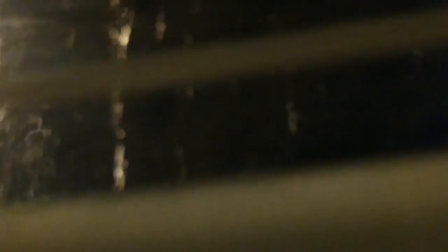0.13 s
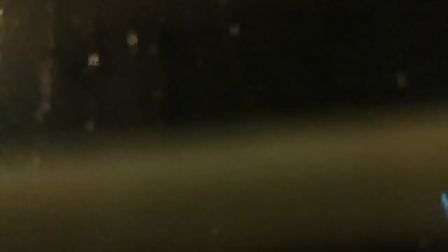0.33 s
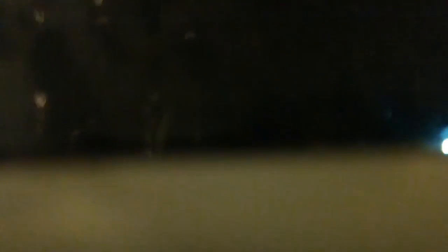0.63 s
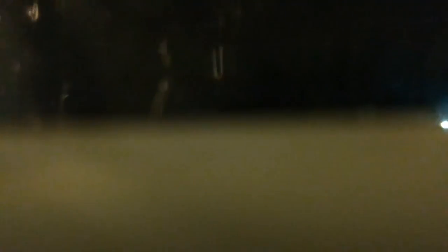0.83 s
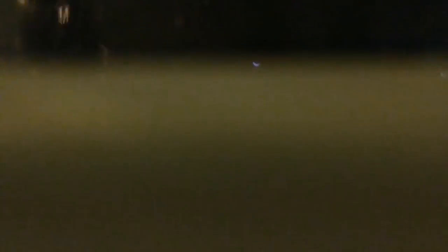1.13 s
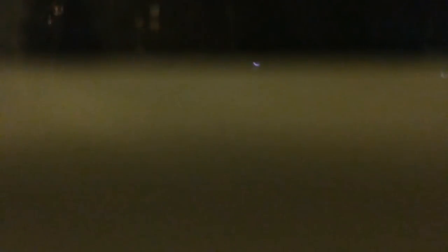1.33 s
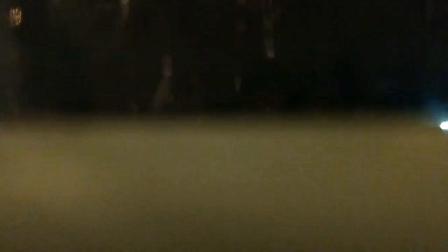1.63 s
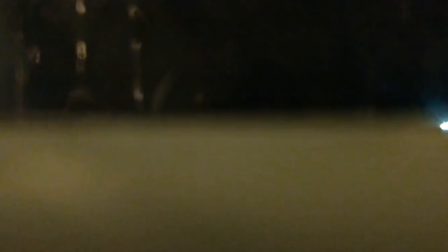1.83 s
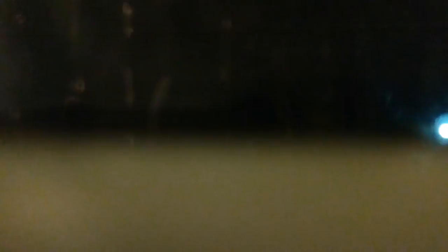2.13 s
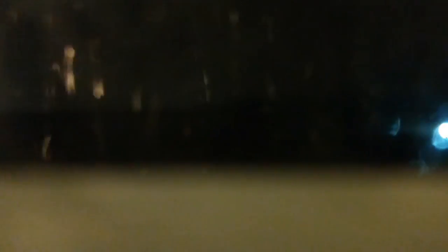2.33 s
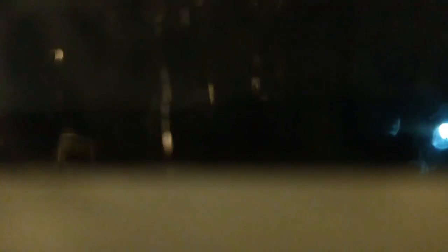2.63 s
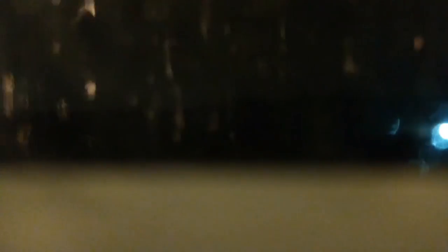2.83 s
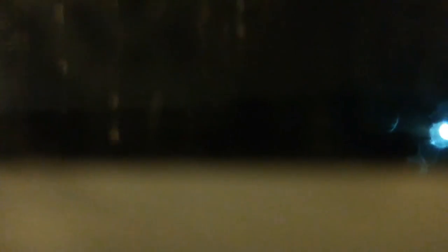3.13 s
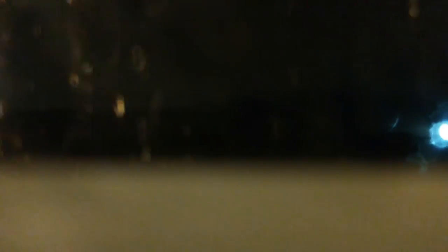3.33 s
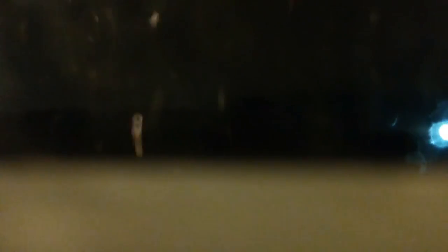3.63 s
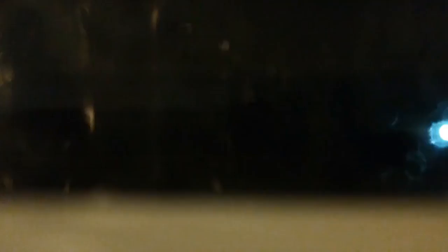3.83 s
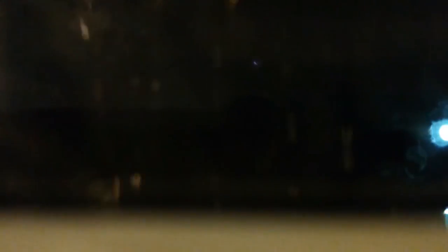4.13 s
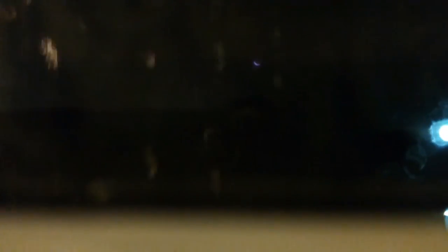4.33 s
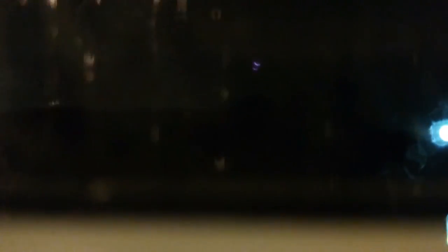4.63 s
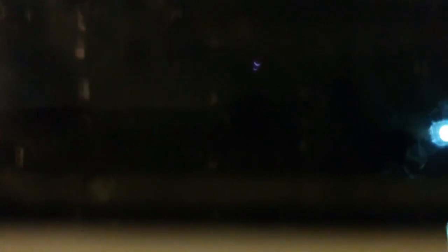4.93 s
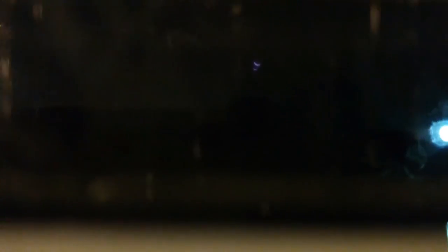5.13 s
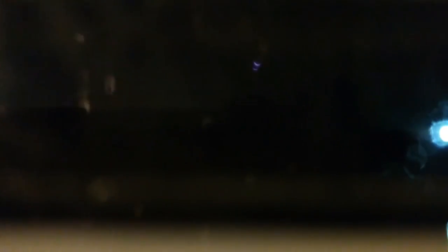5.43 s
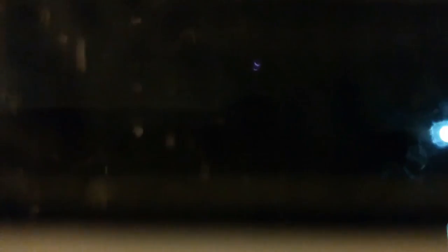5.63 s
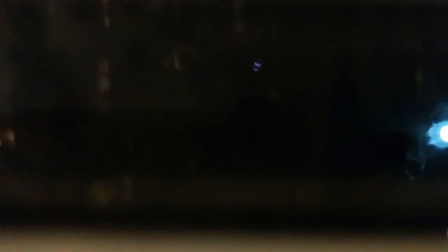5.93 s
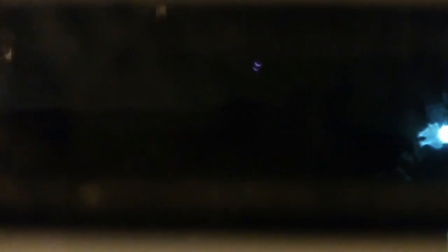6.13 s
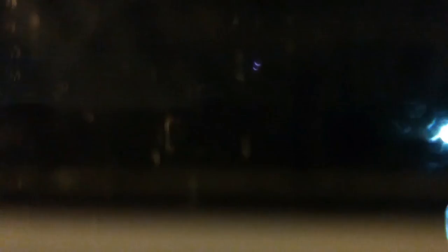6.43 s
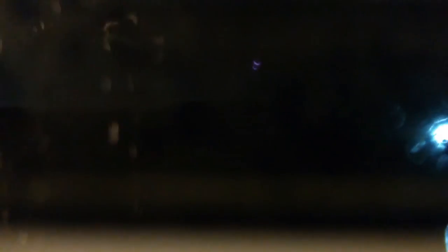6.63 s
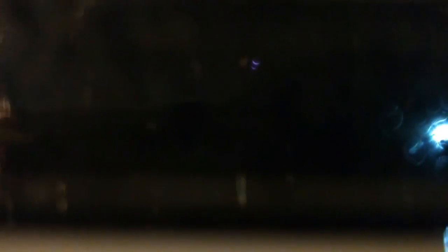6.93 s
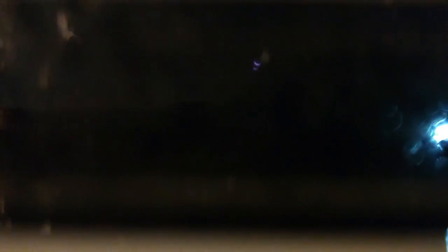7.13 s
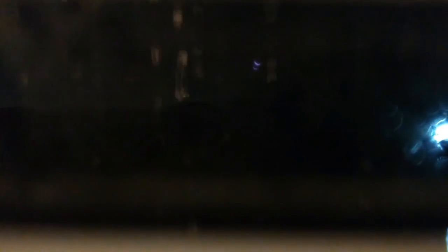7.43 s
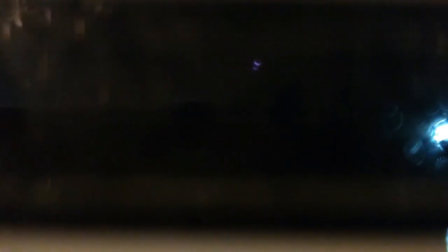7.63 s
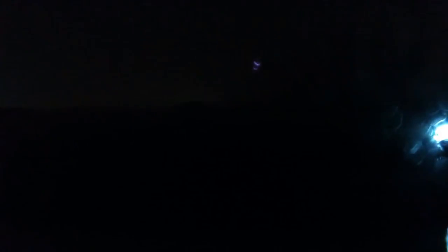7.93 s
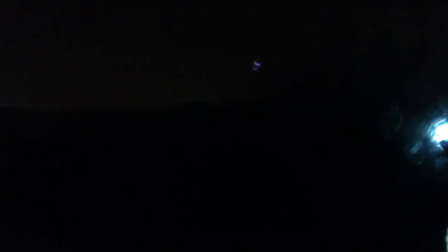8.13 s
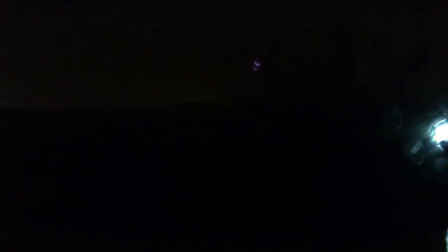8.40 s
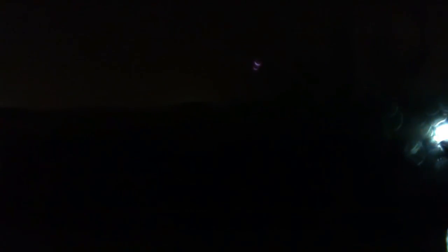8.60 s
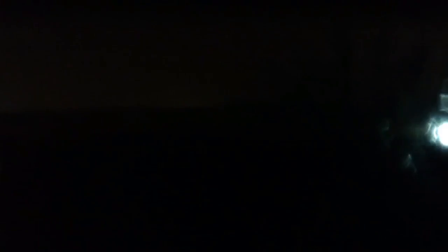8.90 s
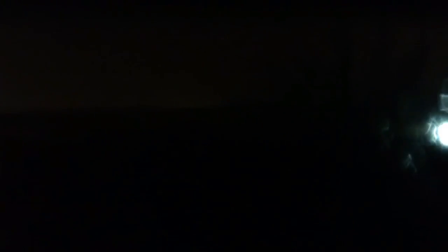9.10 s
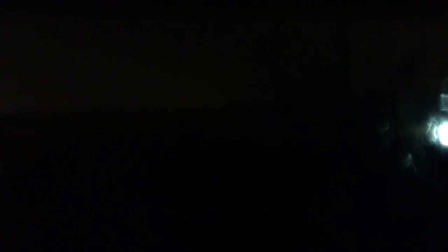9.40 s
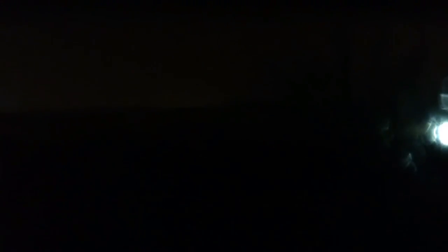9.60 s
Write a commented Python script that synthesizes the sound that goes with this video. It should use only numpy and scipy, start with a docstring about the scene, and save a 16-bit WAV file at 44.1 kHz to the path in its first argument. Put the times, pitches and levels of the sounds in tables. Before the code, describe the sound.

Close indoor rain on a window pane, picked up by a hand-held device pushed through blind slats. Fine slat crackle and knocks start it; around one second a huge overloaded thump briefly squashes the rain. Clustered bumps and rumble continue over strong drumming until about four seconds, then quieter patter with sharp drop taps, another group of knocks at six to seven seconds, and calm rain to the end.

```python
"""Night rain behind a blind

Heavy rain on a window, heard indoors by a hand-held camera pushed between the slats of a blind.
Clumped random impacts and noise, shaped in bands, patter and drum and set the pane's resonances ringing.
Single drops tap as short rings and noise bursts; slats brush with a fine crackle over a thin hiss.
The hand rubs as swelling rumble and bumps as damped rings with a crack and a shudder.
The loudest bumps overload and make the gain control duck, then the rain creeps back up."""
import sys
import numpy as np
from scipy import signal
from scipy.fft import rfft, irfft
from scipy.io import wavfile

SR = 44100
rng = np.random.default_rng(int(sys.argv[2]) if len(sys.argv) > 2 else 0)


def natural_amplitude(level_db):
    """Convert a level in decibels to a linear amplitude factor, elementwise."""
    exponent = np.asarray(level_db, float) / 20
    return 10 ** exponent


def int16_out(signal):
    """Quantize to a 16-bit WAV file."""
    q = np.round(np.clip(np.atleast_2d(signal).T, -1, 1) * 32767)
    wavfile.write(sys.argv[1], SR, q.astype(np.int16))


N = 430416  # samples

# All levels in the tables and the sources are set ahead of the gain control.


def rms_one(x):
    """Scale to rms 1."""
    return x / np.sqrt(np.mean(x ** 2) + 1e-20)


def band(x, low_hz, high_hz):
    """Second-order band-pass."""
    return signal.sosfilt(signal.butter(2, [low_hz, high_hz], "band", fs=SR, output="sos"), x)


def fader(points, **ends):
    """Turn (t/s, level/dB) points into a gain curve, straight in dB between them."""
    s, db = np.transpose(points)
    return natural_amplitude(np.interp(np.arange(N) / SR, s, db, **ends))


def at_hz(points, hz):
    """Read a spectrum on a log-frequency axis."""
    points_hz, values = np.transpose(points)
    return np.interp(np.log(hz), np.log(points_hz), values)


def drift(rate_hz):
    """Slow random wander of rms 1: noise through a double one-pole low-pass at rate_hz."""
    step = 40  # samples between computed points
    r = np.exp(-2 * np.pi * rate_hz * step / SR)
    noise = rng.standard_normal(N // step + 2002)
    slow = signal.lfilter([1], [1, -2 * r, r * r], noise)[2000:]  # skip the settling
    return np.interp(np.arange(N) / step, np.arange(len(slow)), rms_one(slow))


def drops(per_s, spread_db, wash, clump_db):
    """Random impacts of uneven size, median rate per_s, clumped over a noise wash; two unrelated rows, rms 1."""
    size_db = spread_db * np.minimum(rng.exponential(1, (2, N)), 5)
    sizes = natural_amplitude(size_db) * rng.choice([-1, 1], (2, N))
    chance = per_s * natural_amplitude(clump_db * drift(12)) / SR
    impacts = rms_one(sizes * (rng.random((2, N)) < chance))
    return rms_one(impacts + wash * rng.standard_normal((2, N)))


def pitched(impacts, low_hz, high_hz, count):
    """Every drop excites its own narrow range of pitches, dealt out at random; rms 1."""
    edges, dealt = np.geomspace(low_hz, high_hz, count + 1), rng.integers(0, count, N)
    return rms_one(sum(band(impacts * (dealt == k) + 1e-18, edges[k], edges[k + 1]) for k in range(count)))


def burst(chance, low_hz, high_hz, t60):
    """Band noise from a decay of t60 seconds, peak 1."""
    decay = natural_amplitude(-60 * np.arange(len(chance)) / SR / t60)
    noise = band(chance * decay, low_hz, high_hz)
    return noise / np.abs(noise).max()


def ring(hz, t60, rise_s):
    """A sudden push that swings back and dies: a damped cosine with a short rise."""
    t = np.arange(round(.2 * SR)) / SR
    return np.cos(2 * np.pi * hz * t) * natural_amplitude(-60 * t / t60) * (1 - np.exp(-(t / rise_s) ** 2))


def add(out, s, sound):
    """Mix a short sound in at time s."""
    i = round(s * SR)
    out[i:i + len(sound)] += sound[:N - i]


def port(x):
    """The microphone ports dull the impacts: a fourth-order low-pass."""
    return signal.sosfilt(signal.butter(4, 5120, fs=SR, output="sos"), x)


# Tone of the rain through the pane: f/Hz, relative level per hertz/dB
RAIN_COLOUR = [(25.0, -69.5), (55.0, -6.5), (100.0, -9), (170.0, 5.5), (260.0, 6), (400.0, -3.5),
               (560.0, -2.5), (1100.0, -14.5), (2300.0, -18), (3900.0, -14.5), (5200.0, -21), (7000.0, -37),
               (9000.0, -45), (14500.0, -45.5)]
# How alike left and right are: f/Hz, likeness (0 unrelated, 1 identical)
STEREO_LIKENESS = [(100, 0.96), (600, 1), (2200, 0.94), (2800, 0.78), (4400, 0.89), (6000, 0.68), (9000, 1)]


def coloured(low_hz, high_hz, source, flicker_db):
    """One range of the rain, tone-shaped, partly alike on both sides and flickering in level; rms 1."""
    hz = np.maximum(np.arange(N // 2 + 1) * SR / N, 1)
    edges = np.sqrt((1 + (low_hz / hz) ** 6) * (1 + (hz / high_hz) ** 6))
    mid, side = rfft(source) * natural_amplitude(at_hz(RAIN_COLOUR, hz)) / edges
    alike = np.clip(at_hz(STEREO_LIKENESS, hz), 0, 1)
    both = irfft(np.sqrt(1 + alike) * mid + np.sqrt(1 - alike) * side * [[1], [-1]], N)
    flicker = natural_amplitude(flicker_db * (.7 * drift(6) + drift(16)))
    return rms_one(both * flicker)


def input_hiss():
    """Thin, steady high noise of the input."""
    return natural_amplitude(-83) * rms_one(band(rng.standard_normal(N), 8000, 21500))


# The hand shifts its grip: t/s, peak level of the rumble swell/dB
GRIP_RUBS = [(0.05, -26.5), (.55, -22.5), (.95, -18), (1.55, -11), (2.2, -23), (2.6, -24.5), (3.2, -34),
             (3.8, -31), (4.35, -35), (4.7, -31), (5.1, -33.5), (6.04, -27.5), (6.52, -29), (6.75, -34),
             (7.25, -33), (7.702, -40), (8.749, -36), (9.65, -33)]


def rumble(wash):
    """Low noise: a steady floor, with a bell-shaped swell in power for every shift of the grip."""
    floor_db, rise_s, fall_s = -42, 0.14, 0.27
    t = np.arange(N) / SR
    power = natural_amplitude(2 * floor_db)
    for s, db in GRIP_RUBS:
        power = power + natural_amplitude(2 * db) * np.exp(-((t - s) / np.where(t < s, rise_s, fall_s)) ** 2)
    return np.sqrt(power) * coloured(22, 111.6, wash, flicker_db=3.5)


# Slats brushing aside: t/s, level/dB
SLAT_BRUSH = [(0, -38), (.1, -41.5), (.27, -44.5), (.36, -37), (.46, -47), (.65, -44), (.78, -43),
              (0.901, -63), (1.0, -85)]


def brush():
    """Fine, bright crackle of slats sliding over each other: clumped impacts and noise."""
    crackle = drops(740.0, spread_db=-0.5, wash=0.96, clump_db=7.0)[0]
    return rms_one(band(crackle, 3500, 11000)) * fader(SLAT_BRUSH, right=-120)


# Bumps of the hand: t/s, nominal level/dB, ring f/Hz, ring t60/s, crack level re bump/dB
HAND_BUMPS = [(0.113, -6, 906, 0.0069, 7.5), (0.122, -12.5, 177, 0.17, -25), (0.213, -1.5, 180, 0.011, 0),
              (0.246, -8.5, 191, 0.054, -34), (0.465, -18.5, 183, 0.17, -48), (0.531, -6.5, 190, 0.1, -38),
              (0.548, -22, 895, 0.011, -15), (0.59, 5, 153, 0.04, -79), (0.627, -2, 195, 0.15, -37),
              (0.63, -15, 1200, 0.013, -18), (0.646, -2, 190.0, 0.027, -22), (0.6607, 5, 177, 0.052, -42),
              (0.917, 25, 152, 0.039, -58), (0.923, 16, 39.7, 0.12, -67), (0.928, 3, 111, 0.1, -72),
              (1.0, -28, 255, 0.032, -20), (1.053, -4, 288, 0.12, -38), (1.097, -2, 343, 0.033, -40),
              (1.279, -3, 410, 0.013, -37), (1.284, 3.5, 333, 0.023, -35), (1.341, 4, 318, 0.077, -22.5),
              (1.358, 6.5, 159, 0.048, -36), (1.37, 4, 286, 0.018, -31), (1.401, 6.5, 267, 0.033, -18),
              (1.434, 11.5, 247, 0.025, -23), (1.439, 2.5, 495, 0.0095, -26), (1.447, -5, 293, 0.12, -51),
              (1.458, -7, 300, 0.067, -45), (1.5288, 9.5, 630, 0.011, -63), (1.532, 8, 171, 0.043, -45),
              (1.648, -1, 109, 0.07, -64), (1.701, -4, 97.4, 0.17, -3), (1.72, -9, 109, 0.043, 0),
              (1.783, -6, 100, 0.056, -58), (1.876, -5, 133, 0.041, -41.5), (1.93, -11, 180, 0.077, -57.5),
              (1.989, -10.5, 414, 0.027, -18), (2.12, -4, 148.6, 0.027, -46), (2.195, -10, 126, 0.15, -50),
              (2.392, -19, 1010, 0.027, -23.5), (2.428, -1, 137.6, 0.054, -51),
              (2.502, -12, 610, 0.017, -20), (2.694, -6, 183, 0.049, -27), (2.765, -13.5, 274, 0.04, -30),
              (2.767, -15, 770, 0.024, -25), (2.866, -11.5, 530, 0.02, -17), (2.877, -16.5, 518, 0.14, -35),
              (2.904, -22, 444, 0.075, -32), (2.931, -19, 520, 0.063, -34), (3.037, -4.5, 410, 0.015, -18),
              (3.042, -9.5, 282, 0.13, -33), (3.147, -8.5, 415, 0.033, -26), (3.189, -14, 252, 0.064, -28),
              (3.142, -8.5, 675, 0.021, -22), (3.182, -15, 1300, 0.012, -20), (3.184, -8, 420, 0.038, -13),
              (3.05, -17, 604, 0.03, -30), (3.198, -11, 300, 0.043, -40), (3.283, -17, 970, 0.019, -37),
              (3.266, -6.5, 790, 0.026, -19), (3.275, -11, 757, 0.076, -22), (3.301, -8.5, 225, 0.064, -16),
              (3.567, -20, 509, 0.032, -25), (3.573, -20, 955, 0.015, -26), (3.618, -20, 300, 0.047, -35),
              (3.743, -22.5, 915, 0.014, 10), (3.762, -16, 552, 0.017, -25), (3.733, -28, 424, 0.03, -27),
              (3.836, -22, 375, 0.024, -35), (3.799, -24, 485, 0.028, -23), (3.82, -24, 477, 0.04, -33),
              (3.89, -21, 237, 0.14, -35), (3.987, -26.5, 1040, 0.02, -23), (3.751, -11, 468, 0.015, -5),
              (3.777, -25.5, 412, 0.03, -20), (3.865, -16.5, 484, 0.013, -31),
              (4.078, -24.5, 696, 0.03, -36), (4.102, -31, 910, 0.03, -28), (4.467, -18.5, 184, 0.15, -37),
              (5.495, -8, 700, 0.012, -8), (5.5, -25, 920, 0.024, -25), (5.504, -21, 900, 0.03, -23),
              (5.508, -21, 614, 0.015, -26), (5.514, -26, 700, 0.03, -25), (5.632, -21.5, 700, 0.02, -2.5),
              (5.642, -35, 820, 0.014, -33), (5.645, -28, 560, 0.024, -23.5),
              (5.981, -25.5, 224, 0.17, -50), (6.029, -24, 190, 0.11, -45), (6.08, -23, 253, 0.12, -45),
              (6.15, -21, 201, 0.1, -43), (6.304, -10.5, 5620, 0.0031, -7.5), (6.3046, 0, 515, 0.0062, -19),
              (6.3065, 2.5, 141, 0.045, -77), (6.3203, 5, 206, 0.064, -42), (6.399, 7.5, 212, 0.028, -62),
              (6.559, -15.5, 96, 0.068, -17), (6.618, -10, 122, 0.013, -25), (6.629, 2.5, 59, 0.12, -59),
              (6.63, -7.5, 128.4, 0.02, -52.5), (6.631, -15.5, 870, 0.0084, 15.5),
              (6.7495, -1.5, 221, 0.024, -60), (6.753, -3, 123, 0.073, -70),
              (6.916, -15.5, 111, 0.016, 2.5), (7.082, -21.5, 167, 0.17, -29), (7.121, -8, 89, 0.054, -57),
              (7.1327, 11, 152, 0.042, -35.5), (7.14, -1, 150, 0.043, -62.5), (7.138, -2, 60, 0.16, -68.5),
              (8.913, -24, 685, 0.014, -27), (9.337, -22.5, 300, 0.033, -37),
              (9.646, -29.5, 810, 0.014, -27)]
# Camera body modes: f/Hz, level re bump/dB, t60/s
BODY_MODES = [(59, -12.5, 0.15), (300, -31.5, 0.01), (632, -12, 0.012), (1200, -8, 0.0036)]


def knocks():
    """Each bump rings its own note and the body modes, cracks, and leaves a rough shudder around its note."""
    out, chance = np.zeros(N), rng.standard_normal((len(HAND_BUMPS), 6000))
    for (s, db, hz, t60, crack_db), row in zip(HAND_BUMPS, chance):
        # hard, high contacts rise fast
        rise_s = 0.000053 + 0.044 / hz * natural_amplitude(-.35 * (crack_db + 28.0))
        add(out, s, natural_amplitude(db + 6.0) * ring(hz, t60, rise_s))
        for k, (mode_hz, mode_db, mode_t60) in enumerate(BODY_MODES):
            uneven_db = 0.52 * row[k]
            add(out, s, natural_amplitude(db + mode_db + uneven_db) * ring(mode_hz, mode_t60, rise_s))
        # crack: a noise burst and two clicks of fixed pitch
        add(out, s, natural_amplitude(db + crack_db) * burst(row, 1100, 12000, 0.016))
        clicks = ring(3290, 0.0043, rise_s=0.000091) + ring(5500, 0.0039, rise_s=0.00029)
        add(out, s, natural_amplitude(db + crack_db - 6) * clicks)
        shudder = burst(row, 0.53 * hz, 1.5 * hz, 1.7 * t60)
        add(out, s + 0.00393, natural_amplitude(db - 11.5) * shudder)
    return port(out)


# Biggest drops on the glass: t/s, nominal level/dB, ring f/Hz
BIG_DROPS = [(0.383, -11, 3930), (0.414, -10.5, 4220), (0.55, -29, 3740), (0.752, -13, 3430),
             (0.772, -11, 5300), (0.823, -16.5, 3900), (1.778, -8.5, 1920), (1.805, -9, 3160),
             (2.086, -8.5, 3440), (2.545, -12, 4100), (2.603, -15, 3970), (2.64, -17, 3680),
             (2.74, -12, 3670), (2.95, -19, 3100), (3.078, -14, 3150), (3.182, -9.5, 3330),
             (3.219, -9.5, 2030), (3.291, -13, 1200), (3.342, -10.5, 5150), (3.478, -15, 3700),
             (3.519, -14, 3370), (3.537, -18, 1870), (3.699, -16, 3750), (3.744, -16.5, 3200),
             (3.936, -22, 3270), (3.96, -19.5, 4120), (4.171, -21, 3440), (4.41, -23, 3330),
             (4.5, -22, 3550), (4.565, -24.5, 3140), (4.738, -21.5, 1770), (4.835, -20.5, 3500),
             (4.866, -15.5, 4010), (5.331, -16, 4200), (5.457, -25, 5340), (5.685, -22, 3570),
             (5.783, -27.5, 3640), (5.862, -20, 1920), (5.972, -21.5, 3530), (7.81, -20, 1940),
             (8.459, -23, 1970), (8.609, -18, 1030), (8.798, -21, 4280), (9.009, -23, 1790),
             (9.075, -23, 3630), (9.12, -28, 1510), (9.174, -27, 3630), (8.63, -25, 5400),
             (8.676, -28.5, 3500), (8.76, -37, 3620), (9.24, -31.5, 3720), (9.423, -23.5, 3700),
             (9.471, -23, 3270), (9.509, -22, 4000), (9.535, -26, 1850), (9.575, -26, 3640),
             (9.643, -29, 1410), (9.695, -24, 3600), (9.697, -28, 1850), (9.745, -23, 5000),
             (5.632, -28.5, 3830), (1.57, -16.5, 3300), (3.3, -18, 3300), (3.138, -21, 2860),
             (3.4, -19, 2750)]


def taps():
    """A drop rings a few milliseconds on the glass with a noise burst around its pitch and a bright snap."""
    small_count, small_db, spread_db = 45, -34.5, 2.5
    low_hz, high_hz = 1670, 4540
    snap_db = -35.5  # re the drop's nominal level
    # smaller drops fall at random
    when, size, pitch = rng.random((small_count, 3)).T
    small_levels = small_db + spread_db * (2 * size - 1)
    small = zip(when * N / SR, small_levels, low_hz * (high_hz / low_hz) ** pitch)
    every = list(BIG_DROPS) + list(small)
    out, chance = np.zeros(N), rng.standard_normal((len(every), 1500))
    for (s, db, hz), row in zip(every, chance):
        add(out, s, natural_amplitude(db - 6) * ring(hz, .012, rise_s=.0008))
        add(out, s, natural_amplitude(db - 2) * burst(row, .78 * hz, 1.25 * hz, .035))
    out = port(out)
    for (s, db, hz), row in zip(every, chance):
        add(out, s, natural_amplitude(db + snap_db) * burst(row, 6000, 15500, 0.0099))
    return out


# Pane resonances: f/Hz, width/Hz, rms level before the ringing curve/dB
PANE_MODES = [(630, 31.7, -41), (718, 56, -45), (217, 126, -39), (3740, 830, -49), (1468, 110, -54.5),
              (1790, 90, -56), (2020, 72, -58.5), (3110, 58, -59), (5150, 200, -60.5)]
# How loudly the pane rings: t/s, level re the resonance table/dB
PANE_RINGING = [(0, -8), (.9, 9), (1.5, -2), (2.5, 6), (3.4, 5), (4.2, -1.5), (5.4, 4), (5.8, -4),
                (6.3, 0.5), (7.2, -2), (8.0, 4.5), (8.8, 2), (9.76, -1)]


def pane_ringing(wash):
    """Wash and drops excite the pane, each resonance answering as a narrow band of noise."""
    heavy = drops(300.0, spread_db=3.1, wash=0, clump_db=4)[0]
    sides = .3 * wash[1, ::-1] * [[1], [-1]]
    struck = wash[0, ::-1] + 1.4 * heavy + sides
    modes = sum(natural_amplitude(db) * rms_one(band(struck, hz - width / 2, hz + width / 2))
                for hz, width, db in PANE_MODES)
    return fader(PANE_RINGING) * modes


# Drumming, strongest while the camera is pushed through the blind: t/s, level/dB
DRUMMING_LEVEL = [(0, -25), (.3, -29.5), (.72, -25), (.9, -18.5), (1.0, -15), (1.5, -12.5), (2.2, -17.5),
                  (3.25, -16.5), (3.5, -23), (3.68, -25.5), (3.77, -19.5), (3.92, -28.5), (4.05, -31),
                  (5.2, -33.5), (5.5, -30), (5.75, -36), (6.5, -31.5), (6.9, -41.5), (7.25, -28.5),
                  (8.7, -31), (9.0, -34), (9.76, -34)]


def drumming(wash):
    """Heavy drops drum on glass and slats: clumped low-pitched impacts over a strong wash."""
    heavy = pitched(drops(400.0, spread_db=2.6, wash=0, clump_db=5), 90, 2000, count=8)
    return fader(DRUMMING_LEVEL) * coloured(89, 1640, heavy + 3.0 * wash[::-1], flicker_db=1.3)


# Patter of the rain: t/s, level/dB
PATTER_LEVEL = [(0, -34), (.7, -30), (.9, -28.5), (1.5, -26.5), (2.5, -30), (3.3, -31.5), (3.9, -38),
                (4.5, -42.5), (6.2, -47), (6.5, -41.5), (7.1, -38.5), (7.4, -35.5), (8.5, -40.5),
                (9.76, -42.5)]


def patter(wash):
    """Dense near drops, each in its own pitch range, over a wash of far drops."""
    near = pitched(drops(3200.0, spread_db=3.4, wash=0, clump_db=4), 800, 9000, count=20)
    return fader(PATTER_LEVEL) * coloured(827, 17000, near + 1.2 * wash, flicker_db=1.5)


def scene():
    """Hiss, rumble, slats and impacts around the rain; one noise wash feeds rumble and rain layers."""
    wash = rng.standard_normal((2, N))
    handling = rumble(wash) + brush() + knocks()
    rain = pane_ringing(wash) + drumming(wash) + patter(wash)
    return input_hiss() + handling + taps() + rain


def band_limit(x):
    """A steep low-pass at the top of the band."""
    return signal.sosfilt(signal.butter(12, 16480, fs=SR, output="sos"), x)


def record(dry):
    """Gain control, overload, and a left channel that is late and inverted against a thinner right."""
    hold_db, start_cut_db, recover_db_s = -13.5, 23, 13
    sense_s, attack_s = 0.00063, .0013
    left_lag = 20  # samples
    ramp = recover_db_s * np.arange(N) / SR
    sense, attack = np.exp(-1 / (sense_s * SR)), np.exp(-1 / (attack_s * SR))
    level = signal.lfilter([1 - sense], [1, -sense], np.abs(dry).max(axis=0))
    over_db = 20 * np.log10(level + 1e-9) - hold_db
    over_db[0] = start_cut_db
    # follows peaks, recovers steadily
    cut_db = np.maximum(np.maximum.accumulate(over_db + ramp) - ramp, 0)
    cut_db = signal.lfilter([1 - attack], [1, -attack], cut_db, zi=[start_cut_db * attack])[0]
    left, right = dry * natural_amplitude(-cut_db)
    # the left port hears less presence
    left = natural_amplitude(-.9) * (left - .2 * band(left, 1000, 6500))
    left = np.concatenate([np.zeros(left_lag), left[:-left_lag]]) + 0.0025  # small constant offset
    right = -signal.sosfilt(signal.butter(1, 70.0, "high", fs=SR, output="sos"), right)
    overloaded = np.clip([left, right], -1, 1)
    treble_limit = signal.cheby2(12, 60, 16200, fs=SR, output="sos")
    mix = np.clip(signal.sosfilt(treble_limit, overloaded), -1, 1)
    return band_limit(mix)


dry = scene()
out = record(dry)
int16_out(out)
```